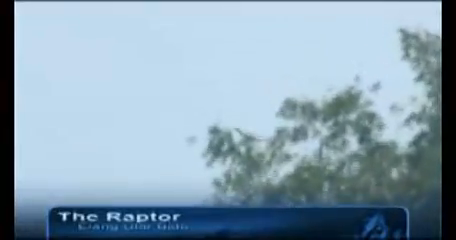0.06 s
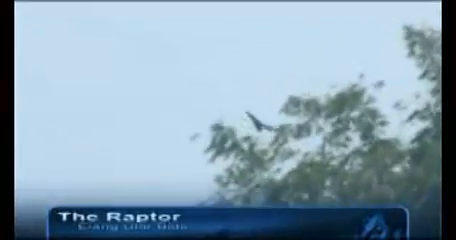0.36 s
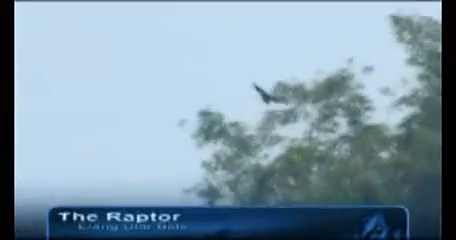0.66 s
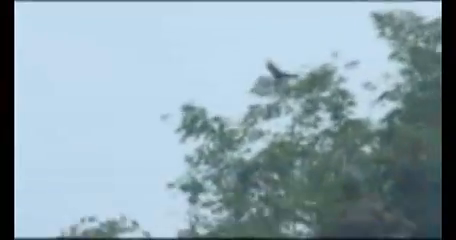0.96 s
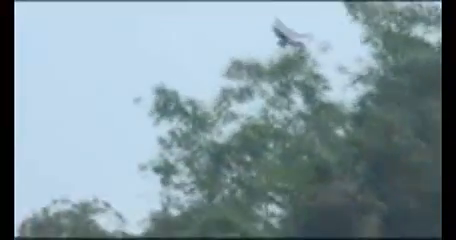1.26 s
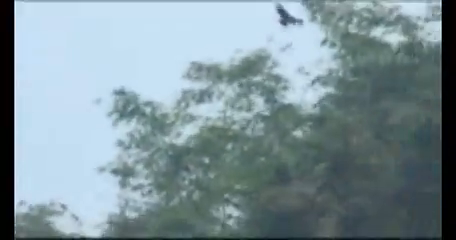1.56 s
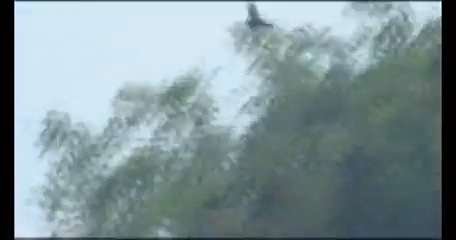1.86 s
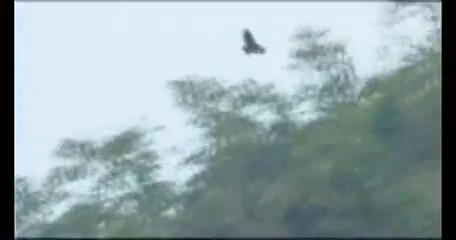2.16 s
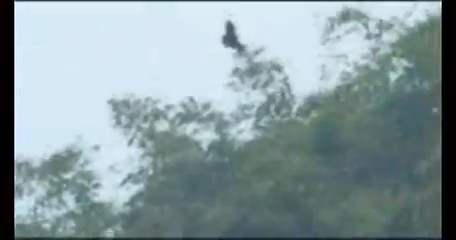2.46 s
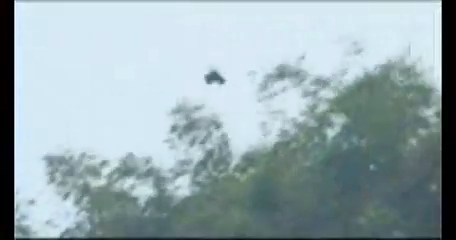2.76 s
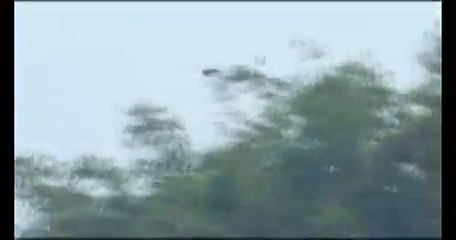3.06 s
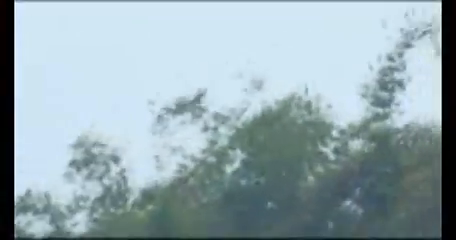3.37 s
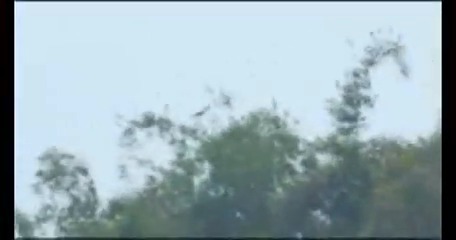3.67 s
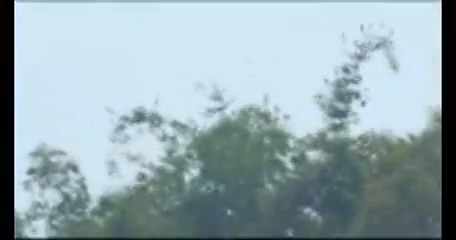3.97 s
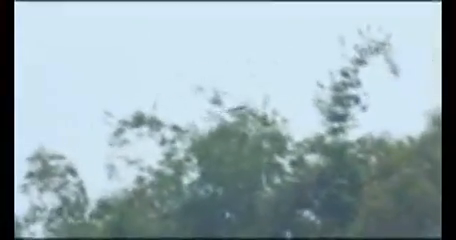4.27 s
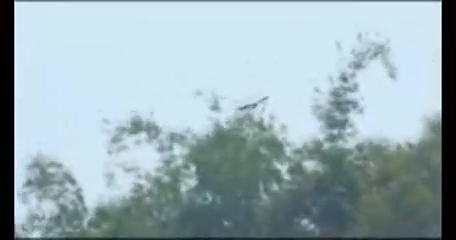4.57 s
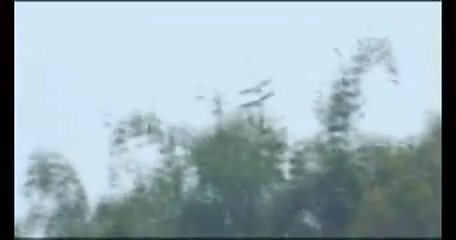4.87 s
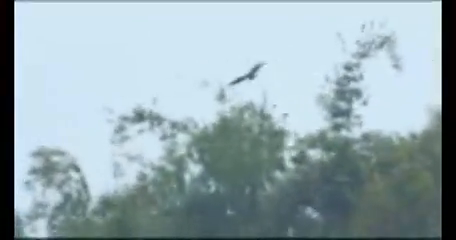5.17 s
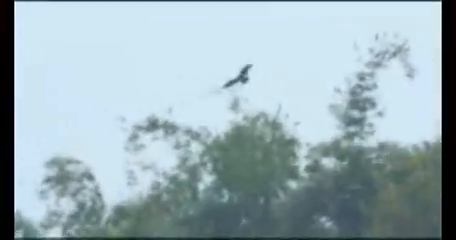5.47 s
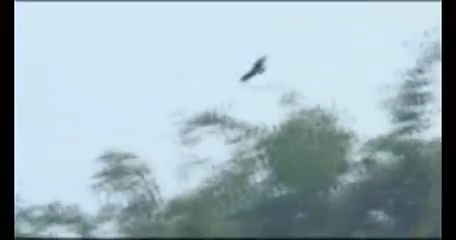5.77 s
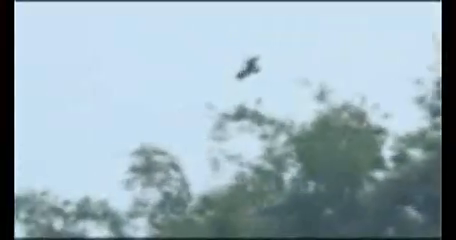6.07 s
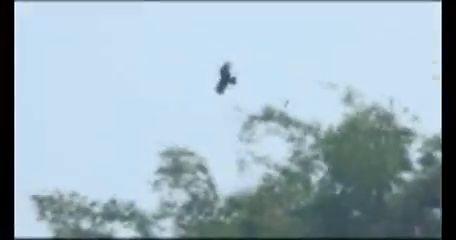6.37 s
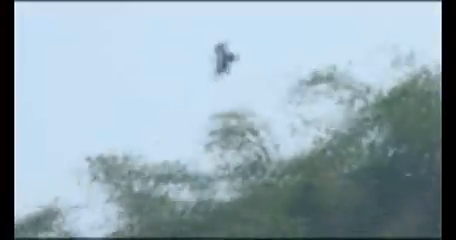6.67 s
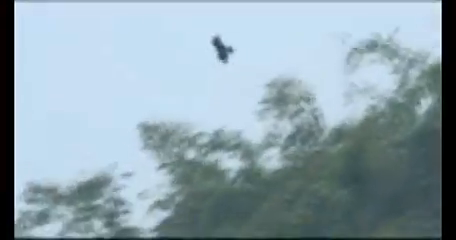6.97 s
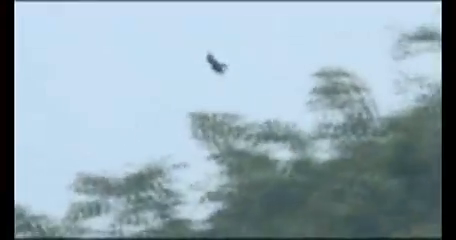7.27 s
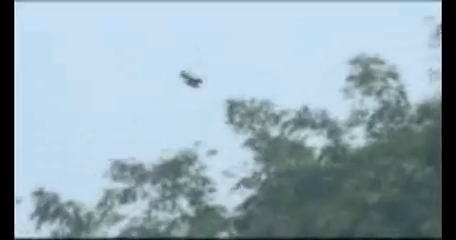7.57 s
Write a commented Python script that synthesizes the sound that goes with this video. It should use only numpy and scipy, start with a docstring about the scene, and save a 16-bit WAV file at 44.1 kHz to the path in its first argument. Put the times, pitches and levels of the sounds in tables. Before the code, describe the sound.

A faint steady hiss and one distant, falling hoot open the scene on a wooded slope. Then a bird of prey calls near the microphone: a quick stuttering trill, followed by shrill whistles with raspy starts, mixed with arched yelps, cracking yips and high chips. A second trill comes midway, then more whistles. The calls scatter in the trees and echo lightly. Four soft, low microphone bumps come late.

```python
"""A faint hiss and one far hoot, then a bird of prey calls near the microphone on a wooded slope.
Its syrinx bends a pure tone into stuttering trills, arched yelps, cracking yips and high chips, and
flutters it into the rasp that opens each long whistle. The trees scatter every note and the hillside
returns it a sixth of a second later. Late on come four soft, low bumps. Behind the microphone a
limiter evens out the calls and a low sampling rate mirrors the highest notes."""
import sys
import numpy as np
from scipy import signal
from scipy.fft import rfft, irfft, next_fast_len
from scipy.io import wavfile
from scipy.ndimage import uniform_filter1d, map_coordinates

SR = 44100
rng = np.random.default_rng(int(sys.argv[2]) if len(sys.argv) > 2 else 0)


def put_to_file(sound):
    """Save the sound as 16-bit audio at rate SR, in the file named by the first command-line argument."""
    columns = np.atleast_2d(sound).T  # one column per channel
    safe = np.clip(columns, -1, 1)
    whole_steps = np.round(safe * 32767)
    wavfile.write(sys.argv[1], SR, whole_steps.astype(np.int16))


N = 340011

# spectrum of the hiss: f/Hz, relative density/dB
HISS_SPECTRUM = [(15, -15.5), (55, -8.5), (150, -6), (300, -8.5), (490, -7.5), (800, -12.5), (1100, -12),
                 (1700, -16), (2300, -17), (4100, -21), (6000, -35), (6900, -43), (7800, -78.5),
                 (9000, -100)]
# filters before and after the sampler: f/Hz, gain/dB
INPUT_FILTER = [(4100, 2), (4500, -11), (5000, -5), (5200, -19), (5500, -30.5)]
OUTPUT_FILTER = [(4400, -0.5), (5500, -1.5), (6300, -12.5), (7000, -25.5), (7400, -37.5), (7800, -60.5),
                 (11000, -73)]
# low bumps at the microphone: t/s, level/dB
BUMPS = [(6.42, -48), (6.51, -49), (6.66, -49), (6.73, -47)]
# decay of the deeper wood: f/Hz, t60/s
WOOD_DECAY = [(2000, 0.09), (3500, 0.558), (5000, 0.53)]
# what the trees reflect: f/Hz, gain/dB
TREE_COLOUR = [(2000, -6.5), (3000, 3), (3550, 2), (3900, -3.5), (4300, 0.5), (5000, -3.5)]
# resonances of the bird's throat: f/Hz, gain/dB
THROAT = [(1800, -9), (2500, 2.5), (3000, 0.5), (3500, 8), (3900, 7), (4200, -5.5), (4500, 4), (5000, -0.5)]
# a soft peep, then a mew in two joined parts: t/s, length/s, evenly spaced f/Hz, base level/dB
PEEP_AND_MEW = [(5.768, 0.028, [3670, 3560, 3700], -37.5), (5.995, 0.044, [2030, 2130, 1900], -24.5),
                (6.022, .086, [2105, 2783, 3041, 3148, 1973], -20)]
# dives that open every whistle and the first yip: t/s, start f/Hz, end f/Hz, base level/dB
DIVES = [(1.666, 3466, 2146, -28), (2.349, 3126, 1708, -19), (2.831, 3507, 2170, -22),
         (4.086, 3257, 2179, -29), (6.925, 3687, 2991, -32), (7.596, 3631, 2203, -30.5)]
# course of one dive: share of the drop done
DIVE_SHAPE = [0, .36, .57, 1]
# chips: t/s, f/Hz, base level/dB, then the last note's f/Hz, length/s, base level/dB
CHIPS = [(3.612, 3871, -17.5, 4807, .02, -26), (6.488, 4113, -16.5, 5000, 0.035, -25)]
# pitch through a quick note: share of the chip's pitch
CHIP_FALL = [1.04, 1, .93]
# yips: t/s, climb/s, fall/s, start f/Hz, end f/Hz, climb base level/dB, fall base level/dB
YIPS = [(2.371, .027, 0.037, 1745, 3539, -23, -22), (4.399, .03, .022, 3299, 3071, -15.5, -16),
        (5.794, .021, .041, 2223, 3896, -18, -21), (7.267, 0.029, .024, 3362, 2988, -18, -21)]
# yelps of two arches: t/s, low top f/Hz, tall top f/Hz, low base level/dB, tall base level/dB
YELPS = [(2.01, 2664, 3812, -30, -21.5), (3.174, 2654, 3769, -26, -22), (4.761, 2070, 3676, -26, -21.5)]
# pitch through a yelp's tall arch and through a trill note: share of the top
YELP_ARCH = [.52, .82, 1, .85, .63, .48]
TRILL_ARCH = [.86, 0.999, .92, 0.548]
# trills: t/s, notes, first gap/s, base level/dB, fade per note/dB, flattening of the first arch/0-1
TRILLS = [(.864, 9, .0476, -20.5, 0.9427, .4), (5.146, 8, .0472, -18, 0.68, .1)]
# whistles: t/s, length/s, rasp/s, swell/s, rasp f/Hz, base level/dB of rasp, catch and held tone
WHISTLES = [(1.685, 0.2413, 0.075, 0.017, 2845, -25.5, -29, -19.5),
            (2.851, 0.233, .07, .015, 2809, -21, -30, -19.5),
            (4.102, 0.2347, .054, 0.049, 2796, -24.5, -41, -19.5),
            (6.934, .298, 0.075, 0.01, 3044, -22, -25, -22),
            (7.613, 0.18, .053, 0.019, 2926, -19.5, -30, -30)]
# pitch of the held tone, one list a whistle: t/s, f/Hz
HELD_PITCH = [
    [(1.75, 3163), (1.808, 3314), (1.844, 3321), (1.862, 3226), (1.882, 3297), (1.925, 3325)],
    [(2.92, 3168), (2.972, 3363), (3.006, 3277), (3.028, 3227), (3.042, 3347), (3.074, 3335), (3.088, 3283)],
    [(4.172, 2679), (4.212, 2814), (4.242, 2507), (4.28, 2681), (4.308, 2611), (4.33, 2599)],
    [(7.005, 2839), (7.037, 3018), (7.071, 2848), (7.105, 2934), (7.117, 2828), (7.211, 2985),
     (7.235, 2891)],
    [(7.665, 2728), (7.685, 2779), (7.7, 2807)],
]


def amp(db):
    """Decibels to gain."""
    return 10 ** (np.asarray(db) / 20)


def unit(x):
    """Scale to rms 1."""
    return x / np.sqrt(np.mean(x ** 2) + 1e-20)


def along(points, hz):
    """Read (f/Hz, value) points along a log frequency axis."""
    f, v = np.transpose(points)
    return np.interp(np.log(hz + 1), np.log(f + 1), v)


def wobble(rate, n):
    """A smooth random curve of n samples, rate knots a second."""
    return map_coordinates(rng.standard_normal(int(n * rate / SR) + 4), [np.arange(n) * rate / SR])


def filtered(x, response):
    """Filter x by a response, a function of frequency."""
    size = next_fast_len(N + SR // 2)
    return irfft(rfft(x, size) * response(np.fft.rfftfreq(size, 1 / SR)), size)[..., :N]


def add(track, s, sound):
    """Mix a sound into the track at time s."""
    room = track[round(s * SR):][:len(sound)]
    room += sound[:len(room)]


def tone(hz, rise_s, fall_s):
    """A pure tone that follows the pitch, with soft ends."""
    t = np.arange(len(hz)) / SR
    gate = np.clip(t / rise_s, 0, 1) * np.clip((t[-1] - t) / fall_s, 0, 1)
    return np.sin(np.pi / 2 * gate) ** 2 * np.sin(2 * np.pi * np.cumsum(hz) / SR)


def hiss(db=-45, waver_db=0.64):
    """A dull, nearly steady bed of noise under the calls."""
    noise = unit(filtered(rng.standard_normal(N), lambda hz: amp(along(HISS_SPECTRUM, hz))))
    return amp(db + waver_db * wobble(2.6, N)) * noise


def converter_sheen(x, db=-49.5):
    """The converter adds very faint mirror tones around multiples of a 3 kHz clock."""
    clock = sum(np.cos(2 * np.pi * hz * np.arange(N) / SR) for hz in (6000, 9000, 12000, 15000))
    return filtered(amp(db) * x * clock, lambda hz: hz > 8200)


def limiter(x, ceiling_db=-25.0, knee=1.36, window_s=0.00087):
    """The gain gives way softly as the short-term level nears the ceiling."""
    size = round(window_s * SR)
    level = np.sqrt(np.abs(uniform_filter1d(x ** 2, size)))
    gain = (1 + (level / amp(ceiling_db)) ** knee) ** (-1 / knee)
    return x * uniform_filter1d(gain, size)


def far_hoot(start_s=.53, length_s=0.1837, from_hz=570, to_hz=485, db=-52):
    """One faint, falling hoot from far away."""
    out = np.zeros(N)
    hz = np.linspace(from_hz, to_hz, round(length_s * SR))
    add(out, start_s, amp(db) * tone(hz, rise_s=0.028, fall_s=0.026))
    return out


def bumps(hz=32, width_s=0.028):
    """Short, deep swells of pressure as the microphone swings."""
    t = np.arange(N) / SR
    return sum(amp(db) * np.exp(-((t - s) / width_s) ** 2) * np.sin(2 * np.pi * hz * (t - s))
               for s, db in BUMPS)


def hillside(x, delay_s=.1633, first_db=-21.5, second_db=-33, fading_db=5.54):
    """The slope, some 28 m off, returns two echoes; the long path dulls them and fades them in and out."""
    dulled = filtered(x, lambda hz: amp(along([(2600, 2), (4000, -10.0), (4800, -7)], hz)))
    lag = lambda hz: np.exp(-2j * np.pi * hz * delay_s)
    echoes = filtered(dulled, lambda hz: amp(first_db) * lag(hz) + amp(second_db) * lag(hz) ** 2)
    return echoes * amp(fading_db * wobble(25, N))


def trees(x, near_db=-11, near_t60=0.1477, far_db=-20, first_s=0.0066, spread_s=0.081, trunks=26):
    """Nearby trunks throw back separate reflections, the deeper wood a diffuse tail."""
    out, step = np.zeros(N), SR // 3
    for centre in range(0, N + step, step):  # the paths change as the bird flies
        hz, t, noise = signal.stft(rng.standard_normal(SR // 2), SR, nperseg=256)
        decay = amp(-60 * t / along(WOOD_DECAY, hz)[:, None])
        far = signal.istft(noise * decay, SR, nperseg=256)[1][:SR // 2]
        delays = (np.arange(trunks) + rng.random(trunks)) / trunks * spread_s
        strengths = rng.standard_normal(trunks) * amp(-60 * delays / near_t60)
        near = np.bincount((delays * SR).astype(int), strengths, len(far))
        tail = amp(near_db) * near / np.linalg.norm(near) + amp(far_db) * far / np.linalg.norm(far)
        span = np.arange(max(centre - step, 0), min(centre + step, N))
        crossfaded = x[span] * np.cos(np.pi / 2 * (span - centre) / step)
        add(out, span[0] / SR + first_s, signal.fftconvolve(crossfaded, tail))
    return filtered(out, lambda hz: amp(along(TREE_COLOUR, hz)))


def low_noise(voice, db=-19, corner_hz=1300):
    """A faint, dull noise swells under the loudest slurs."""
    loudness = np.sqrt(np.abs(uniform_filter1d(voice ** 2, 160)))
    noise = unit(filtered(rng.standard_normal(N), lambda hz: 1 / np.sqrt(1 + (hz / corner_hz) ** 4)))
    return amp(db) * loudness ** 2 / loudness.max() * noise


def slurs(notes, jitter=0.01823, crack=0.039, shimmer_db=5.5, dive_db=-5, climb_db=-7, tick_db=-21):
    """The syrinx bends each note, which swells at the throat's resonances and thins on steep glides."""
    out, steep_hz_per_s = np.zeros(N), 220000
    for s, length, pitches, db in notes:
        curve = np.polyfit(np.linspace(0, 1, len(pitches)), pitches, len(pitches) - 1)
        hz = np.polyval(curve, np.linspace(0, 1, round(length * SR)))
        slope = np.gradient(hz) * SR / steep_hz_per_s
        dive, climb = np.clip(-slope, 0, 1) ** 2, np.clip(slope, 0, 1)
        shake, shimmer, tick = (wobble(rate, SR // 8)[:len(hz)] for rate in (550, 260, 2600))
        level = db + along(THROAT, hz) + dive_db * dive + climb_db * climb + shimmer_db * shimmer
        shaken_hz = hz * (1 + (jitter + crack * dive) * shake)
        add(out, s, amp(level) * tone(shaken_hz, rise_s=0.0023, fall_s=0.0015))
        # a faint tick of noise on the steepest dives
        add(out, s, amp(db + tick_db) * dive ** 2 * tick)
    return out


def dives(length_s=.015):
    """Notes that sweep down fast, with a slight shoulder halfway."""
    return [(s, length_s, start + (end - start) * np.array(DIVE_SHAPE), db)
            for s, start, end, db in DIVES]


def chips(note_s=0.016, step_s=.0225, fade_db=8):
    """Two falling notes, the second weaker, then a level one in the high register."""
    notes = []
    for s, hz, db, high_hz, high_s, high_db in CHIPS:
        notes += [(s + k * step_s, note_s, hz * np.array(CHIP_FALL), db - k * fade_db) for k in (0, 1)]
        notes.append((s + 2 * step_s, high_s, [high_hz, high_hz], high_db))
    return notes


def yips(break_hz=3903, flip_hz=5000, pause_s=0.004):
    """The voice climbs until it breaks, flips up and slides back down."""
    glide = lambda start, end, halfway: [start, start + halfway * (end - start), end]
    notes = []
    for s, climb_s, fall_s, start_hz, end_hz, climb_db, fall_db in YIPS:
        notes.append((s, climb_s, glide(start_hz, break_hz, halfway=.78), climb_db))
        notes.append((s + climb_s + pause_s, fall_s, glide(flip_hz, end_hz, halfway=0.54), fall_db))
    return notes


def yelps(foot_hz=1907, low_s=.027, gap_s=.005, tall_s=.054):
    """A small, low arch of pitch leads into a tall one."""
    notes = []
    for s, low_hz, tall_hz, low_db, tall_db in YELPS:
        notes.append((s, low_s, [foot_hz, low_hz, foot_hz], low_db))
        notes.append((s + low_s + gap_s, tall_s, tall_hz * np.array(YELP_ARCH), tall_db))
    return notes


def trills(first_hz=4772.4, last_hz=4072, first_s=.018, last_s=.024, slowing_s=.0007, push_db=9):
    """Arched notes start strained, loud, high and shallow, then sink, slow down and dive deeper."""
    notes = []
    for s, count, gap, db, fade_db, flattening in TRILLS:
        for k, (sharp, deep, loud) in enumerate(rng.standard_normal((count, 3))):
            strain = np.exp(-k / 2.6)  # eases over the first few notes
            top_hz = (last_hz + (first_hz - last_hz) * strain) * (1 + .01 * sharp)
            depth = 1 - flattening * (1 - k / (count - 1)) + .06 * deep
            length = last_s + (first_s - last_s) * strain
            start = s + k * gap + slowing_s * k * (k - 1) / 2
            level = db - k * fade_db + push_db * strain + 0.5 * loud
            notes.append((start, length, top_hz * np.array(TRILL_ARCH) ** depth, level))
    return notes


def whistles(flutter_hz=275, swing=0.1833, scratch=.06, chop=0.628, jitter=0.0054,
             burst_db=3, waver_db=4.5, attack_s=0.041, release_s=.013, split_db=-25):
    """A fast flutter sweeps and chops the tone; the voice catches, then swells into a clean whistle."""
    out = np.zeros(N)
    for row, pitch in zip(WHISTLES, HELD_PITCH):
        s, length, rasp_s, swell_s, rasp_hz, rasp_db, catch_db, held_db = row
        t = np.arange(0, length, 1 / SR)
        rasp = np.interp(t, [.62 * rasp_s, rasp_s], [1, 0])  # holds, then clears
        hz = rasp * rasp_hz + (1 - rasp) * np.interp(s + t, *np.transpose(pitch))
        db = np.interp(t, [0, attack_s, rasp_s, rasp_s + swell_s, length - release_s, length],
                       [rasp_db - 8, rasp_db, catch_db, held_db, held_db, held_db - 9.5])
        drift, shake, scrape, burst, waver = (wobble(rate, SR // 2)[:len(t)]
                                              for rate in (161, 212, 1400, 323, 45))
        flutter = 2 * np.pi * np.cumsum(flutter_hz * (1 + 0.2 * drift)) / SR
        # every pulse of the flutter is an upward sweep, loudest halfway
        hz *= 1 + rasp * (swing * np.sin(flutter) + scratch * scrape) + jitter * shake
        pulses = 1 - chop * rasp * (1 - np.cos(flutter)) / 2
        level = db + waver_db * waver + burst_db * rasp * burst
        add(out, s, amp(level) * pulses * tone(hz, rise_s=0.0025, fall_s=0.006))
        # a faint tone a fifth above splits off during the swell
        unsettled = (t > rasp_s) & (t < rasp_s + 1.2 * swell_s)
        fifth = tone(1.5 * hz[unsettled], swell_s / 2, swell_s / 2)
        add(out, s + rasp_s, amp(held_db + split_db) * fifth)
    return out


def scene():
    """At the microphone: the bird in front, the trees around it, the slope and the hoot far behind."""
    chatter = slurs(trills())
    calls = slurs(yelps() + yips() + chips() + dives() + PEEP_AND_MEW)
    held = whistles()
    quick = chatter + calls
    # sharp slurs, the trills above all, stir up more reflections than held whistles
    scatter = trees(amp(1) * chatter + calls + amp(-5) * held)
    direct = quick + held + low_noise(quick)
    echoes = hillside(quick + amp(1.35) * held + amp(4) * scatter)
    return (direct + scatter + echoes + far_hoot() + bumps())[None]


def record(dry, gain_db=1, stride=4, top_hz=12100):
    """A limiter, coarse sampling whose soft output filter lets mirrored tones through, and hiss."""
    limited = limiter(amp(gain_db) * dry)
    narrow = filtered(limited, lambda hz: amp(along(INPUT_FILTER, hz)) * (hz < SR / stride / 2))
    sampled = stride * narrow * (np.arange(N) % stride == 0)
    mirrored = filtered(sampled, lambda hz: amp(along(OUTPUT_FILTER, hz)))
    return filtered(mirrored + converter_sheen(narrow) + hiss(), lambda hz: hz < top_hz)


dry = scene()
out = record(dry)
put_to_file(out)
```